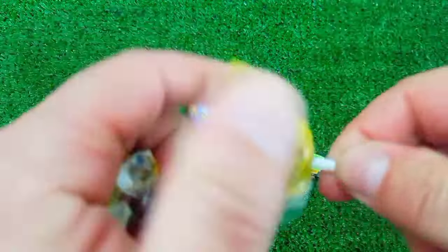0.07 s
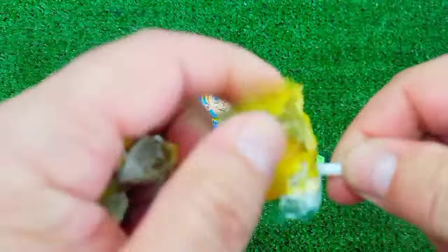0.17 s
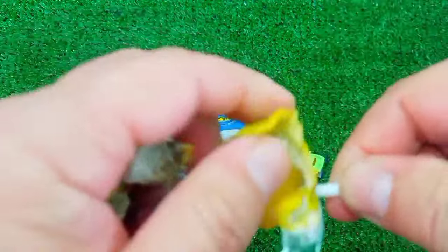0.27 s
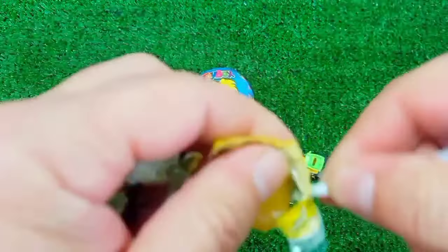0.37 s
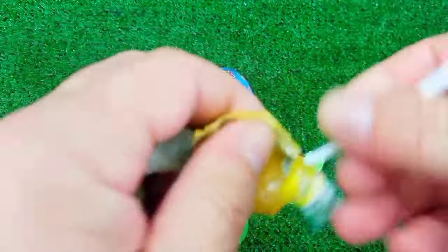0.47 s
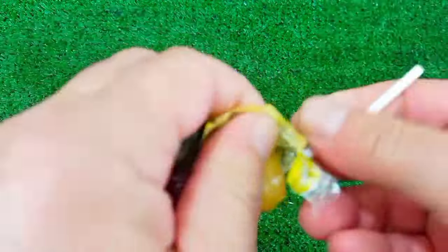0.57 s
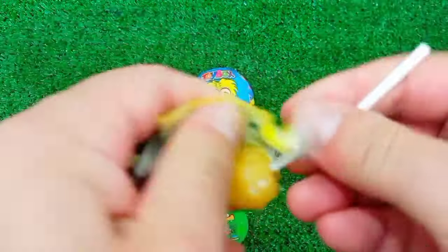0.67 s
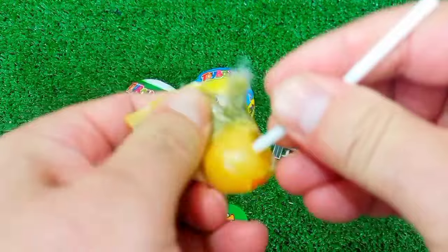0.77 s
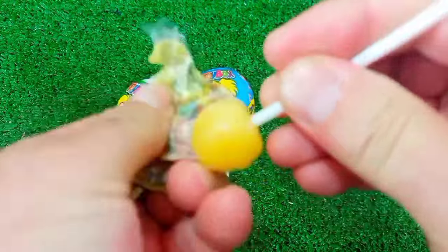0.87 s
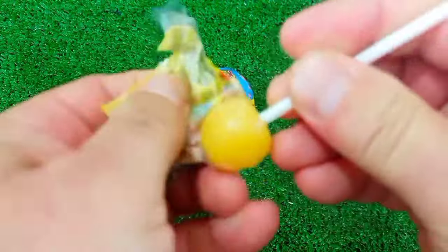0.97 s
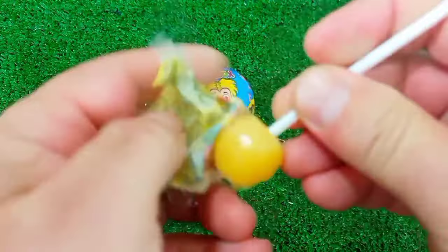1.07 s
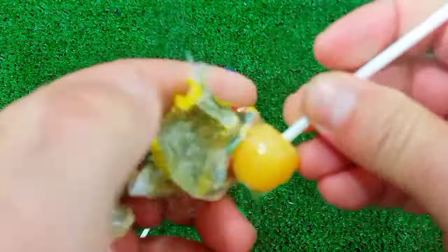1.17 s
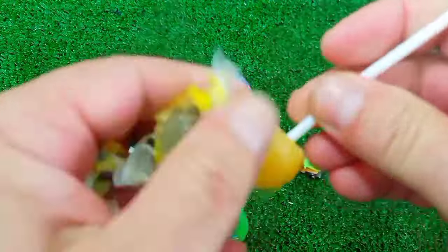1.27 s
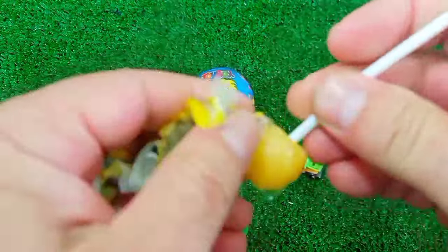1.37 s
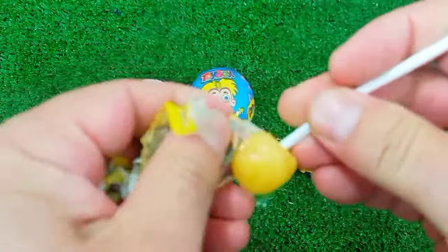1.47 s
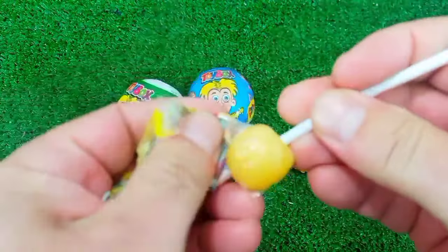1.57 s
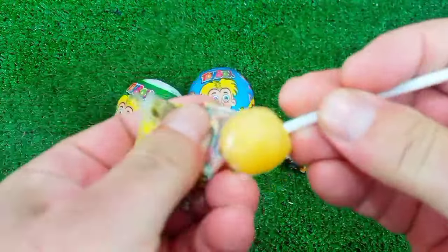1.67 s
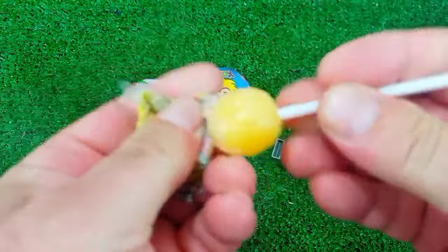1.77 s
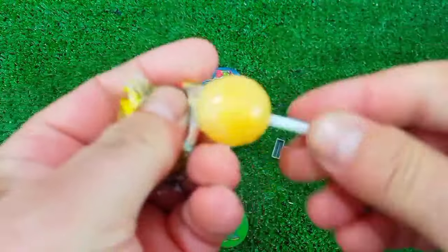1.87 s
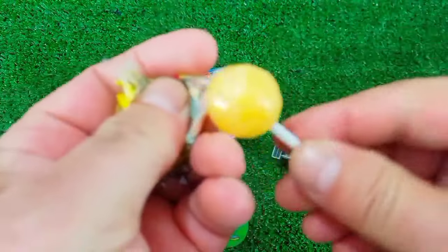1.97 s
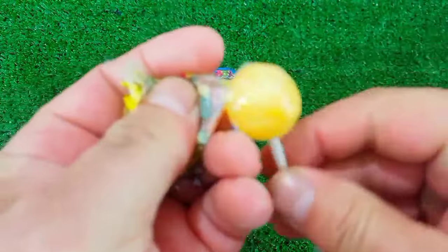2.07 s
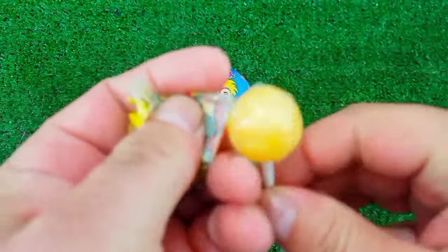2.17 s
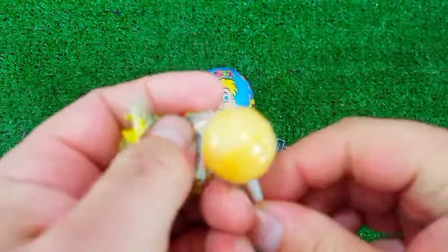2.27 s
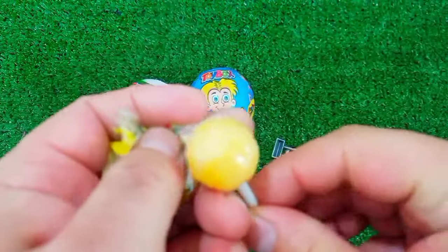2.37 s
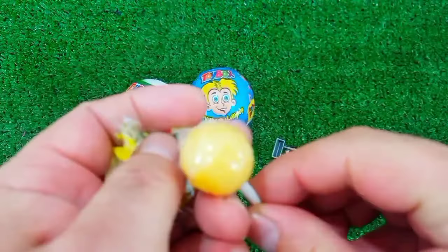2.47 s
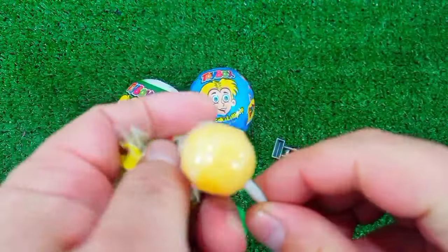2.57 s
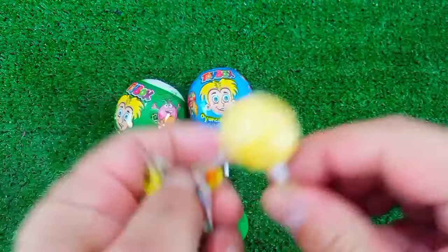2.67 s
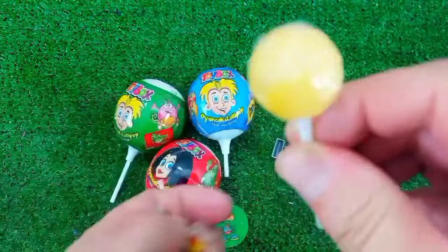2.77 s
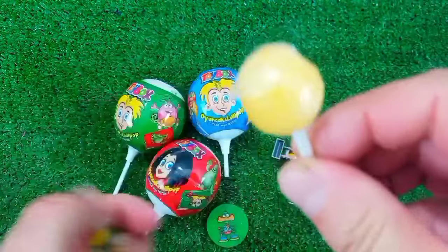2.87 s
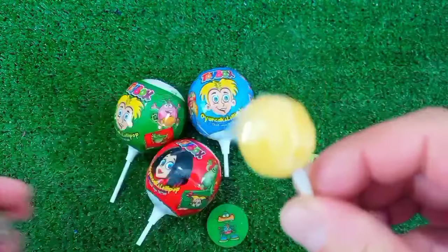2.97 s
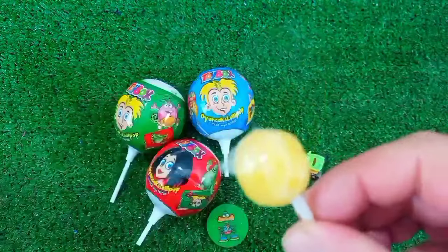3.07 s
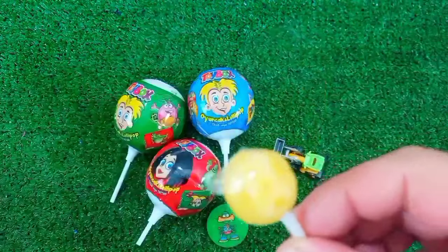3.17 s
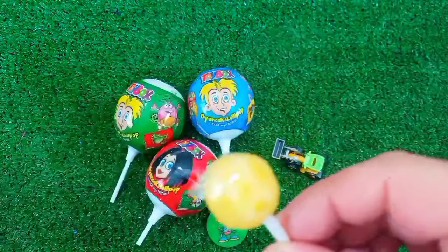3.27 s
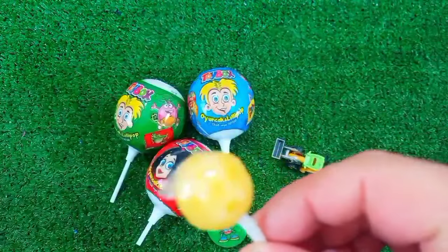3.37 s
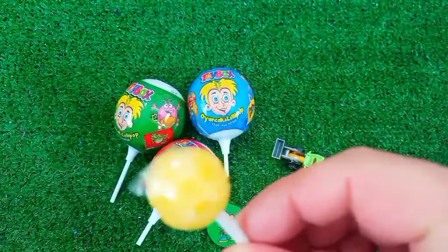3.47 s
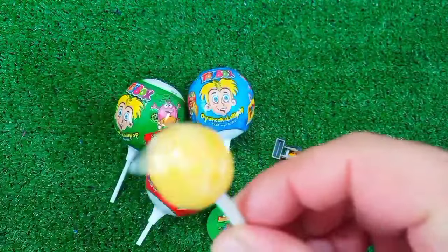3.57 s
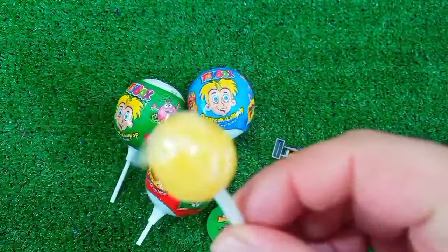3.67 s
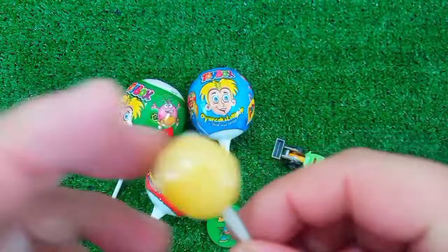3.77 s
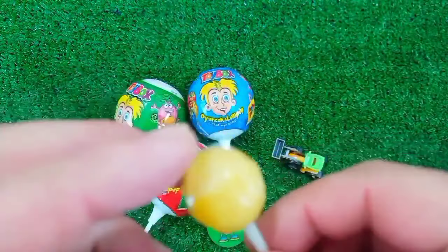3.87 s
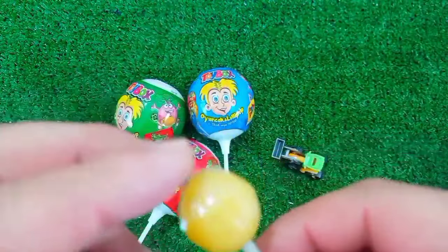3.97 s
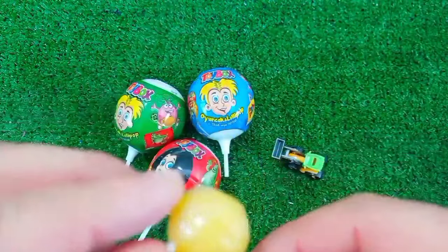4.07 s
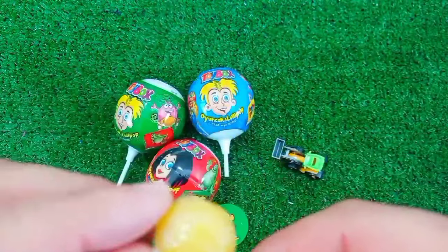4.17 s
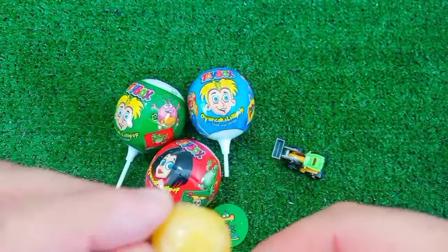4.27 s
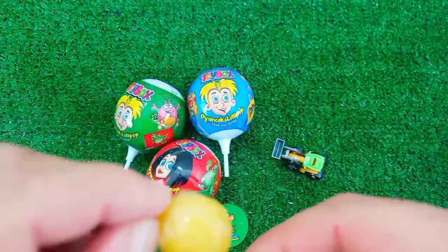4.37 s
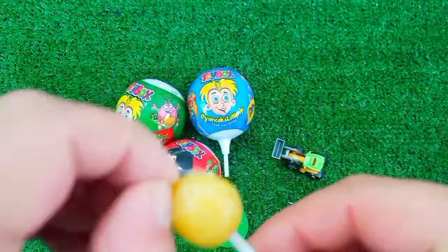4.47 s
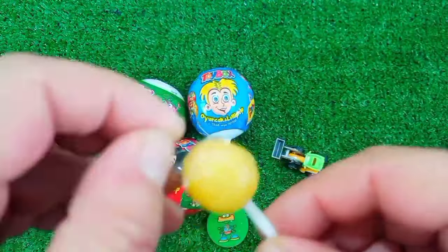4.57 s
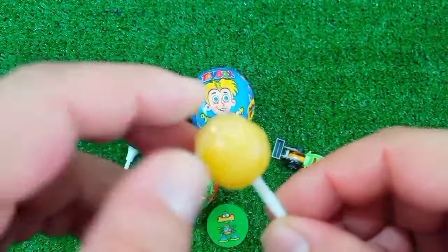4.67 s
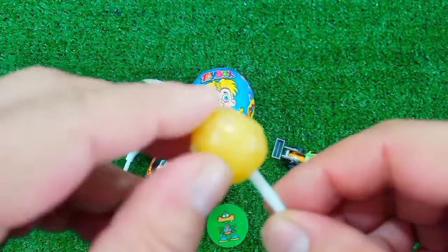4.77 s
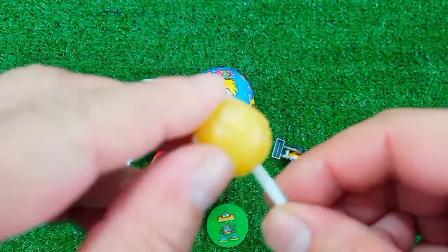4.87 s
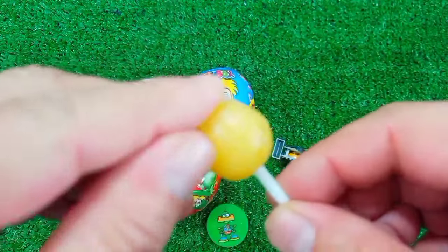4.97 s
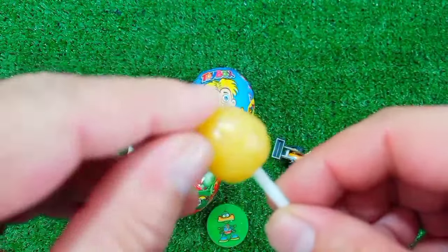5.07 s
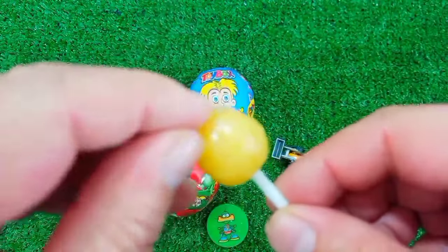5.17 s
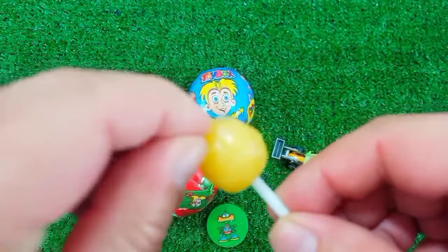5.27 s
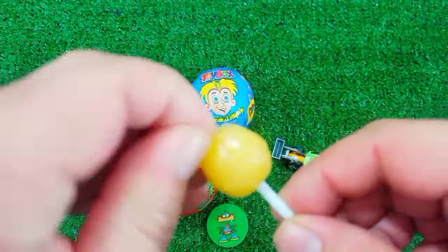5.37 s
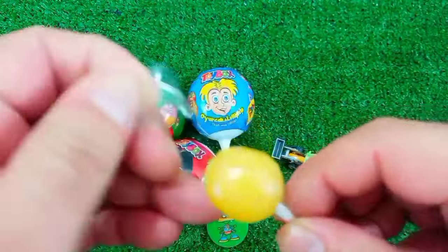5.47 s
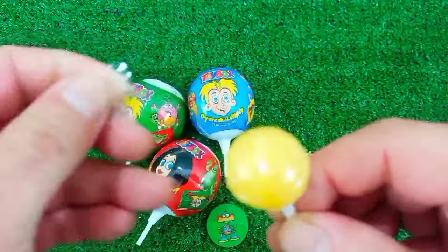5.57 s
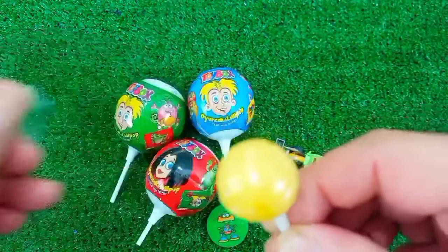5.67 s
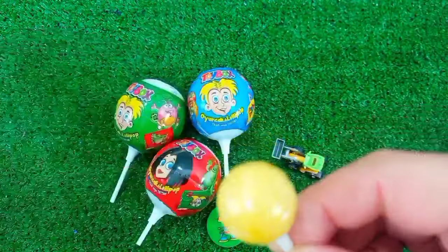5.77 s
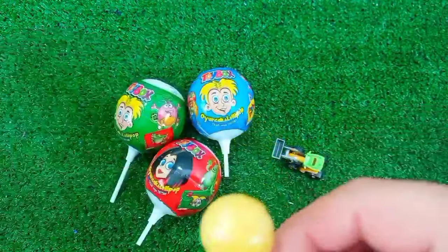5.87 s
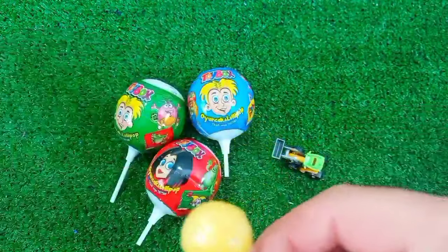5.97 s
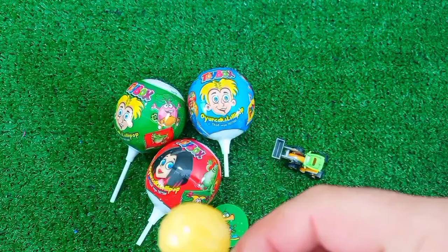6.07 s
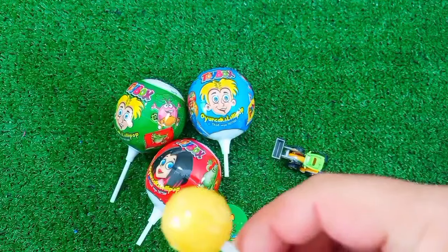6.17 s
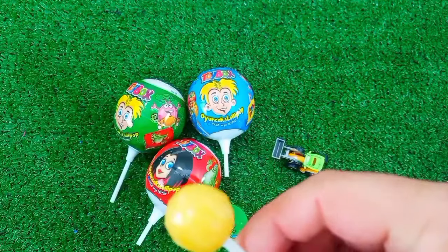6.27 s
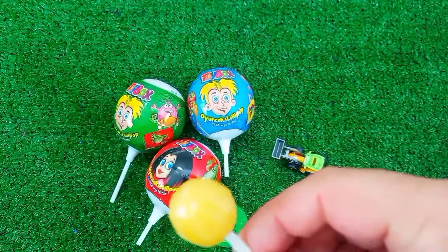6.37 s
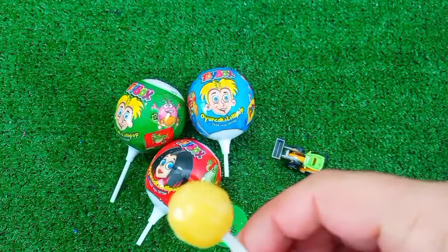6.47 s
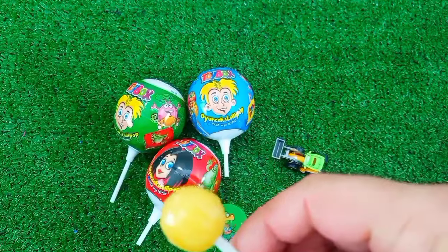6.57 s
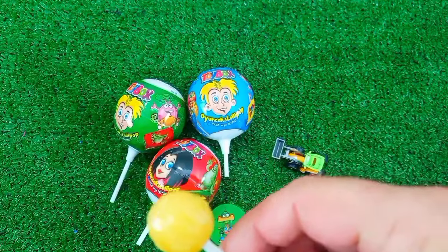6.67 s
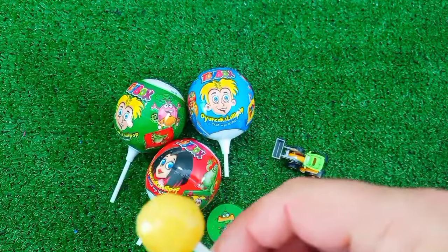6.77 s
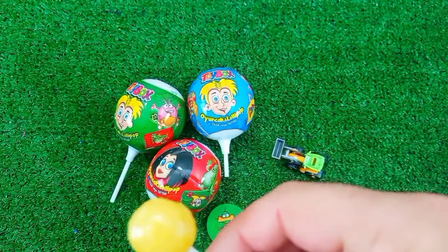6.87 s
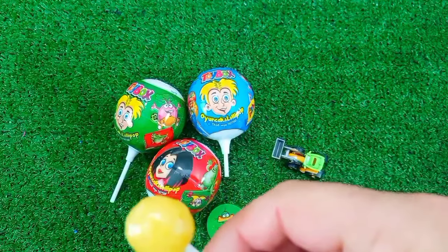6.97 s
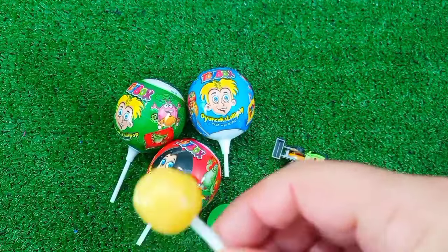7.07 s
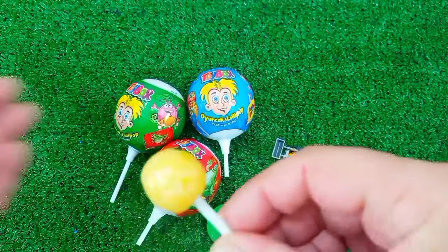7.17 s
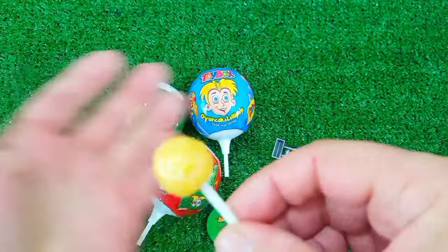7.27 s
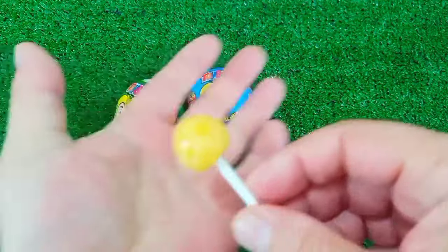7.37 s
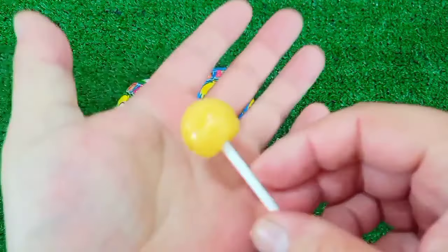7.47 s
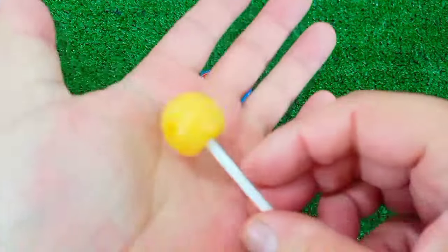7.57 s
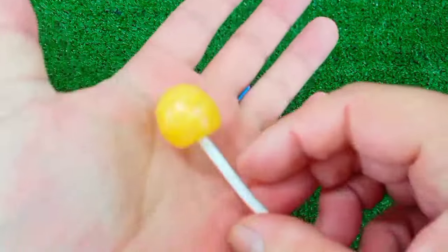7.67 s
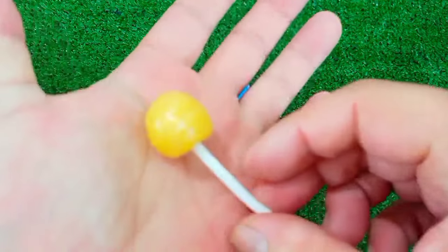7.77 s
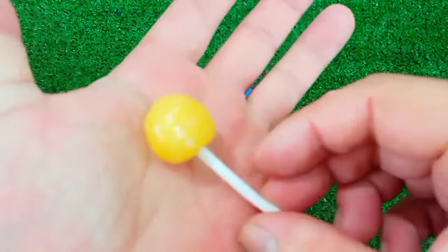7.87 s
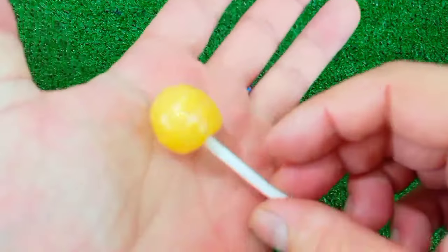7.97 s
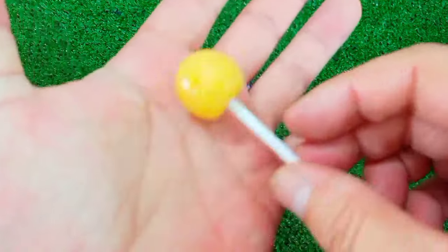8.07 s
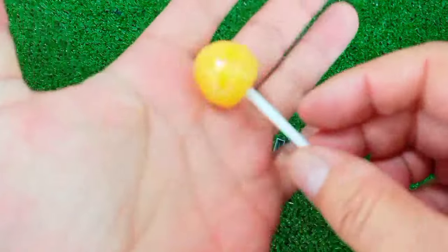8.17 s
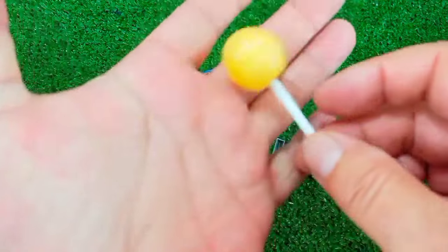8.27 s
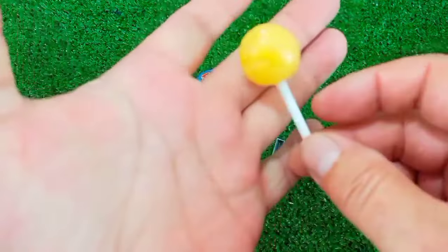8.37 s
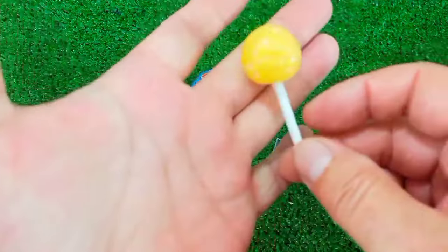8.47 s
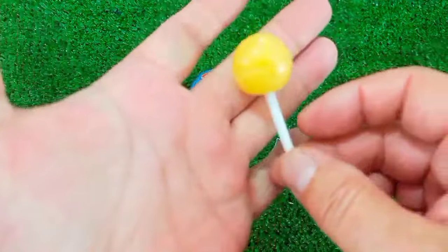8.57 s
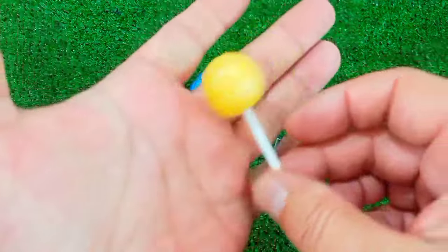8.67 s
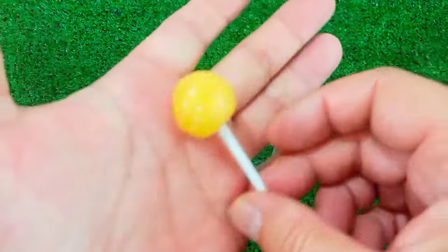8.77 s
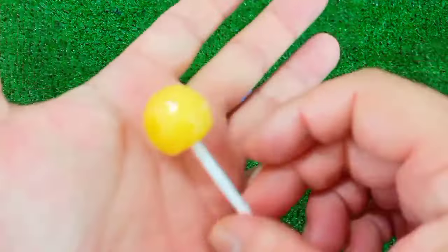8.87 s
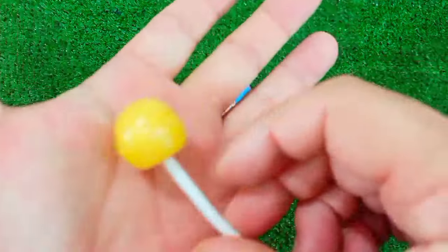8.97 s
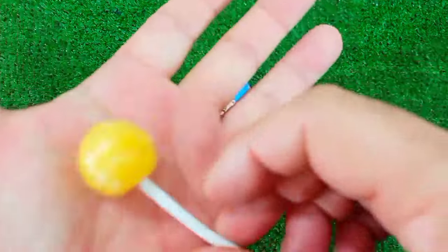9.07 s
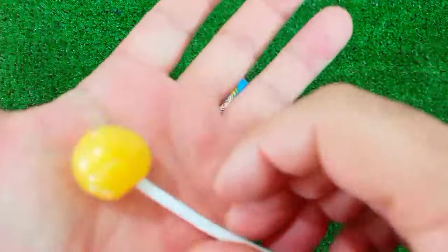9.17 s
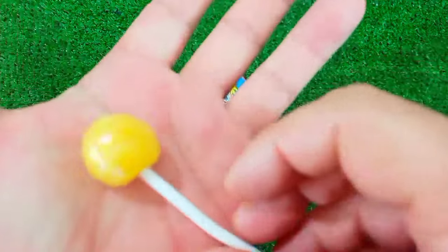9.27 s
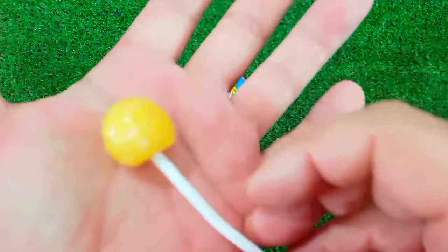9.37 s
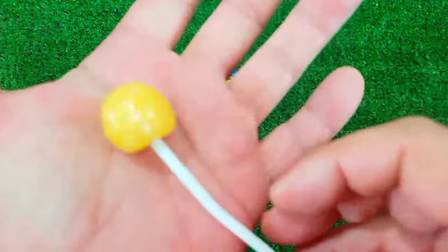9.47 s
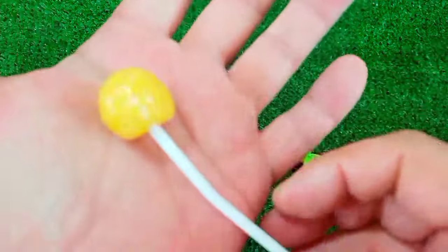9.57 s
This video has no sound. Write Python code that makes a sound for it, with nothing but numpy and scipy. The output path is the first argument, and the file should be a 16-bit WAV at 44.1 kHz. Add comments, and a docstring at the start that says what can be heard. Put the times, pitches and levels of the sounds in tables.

```python
"""Peeling a stiff plastic wrapper

Fingers tear and peel the wrapper off a lollipop close to a phone microphone, then pick off the last scraps.
Each crease that buckles is a snap: a click with a ragged tail, coloured by the ring of a patch of film.
Tugs swell a swarm of small creases and the swish of sliding film; resonant rubs, squeaks, the murmur of
skin and a few low one-sided pops join in, and a small room answers briefly with a tail of decaying noise.
Behind lie shaped noise as hiss, narrow noise bands as a faint whine, a distant cooing and soft low bumps."""
import sys
import numpy as np
from scipy import signal
from scipy.fft import rfft, irfft, next_fast_len
from scipy.io import wavfile
from scipy.ndimage import uniform_filter1d, minimum_filter1d

SR = 44100
rng = np.random.default_rng(int(sys.argv[2]) if len(sys.argv) > 2 else 0)


def generate_wav(signal):
    """Clip the signal to [-1, 1] and save it as 16-bit WAV at the path in sys.argv[1]."""
    frames = np.transpose(np.atleast_2d(signal))
    scaled = np.clip(frames, -1, 1) * 32767
    pcm = np.round(scaled).astype(np.int16)
    wavfile.write(sys.argv[1], SR, pcm)


N = 424683

# Loud buckling creases: [t/s, peak level/dB, main ring f/Hz, lows level/dB, highs level/dB];
# lows (full below 2500 Hz) and highs (full above 9300 Hz) are tilts added to the film colour
CREASE_SNAPS = [(0.0073, -4, 4200, -4, -1), (0.026, -10, 4000, -2.5, -32.5), (0.043, -5, 5730, -3, -24),
                (0.0529, -3, 5170.0, 8.5, -18), (0.0668, -8.5, 6540, 5.5, -18.5),
                (0.074, 1, 6000, -17.5, -18), (0.0906, 0.5, 4080, 4, -10.5), (0.099, -5.5, 6260, 8, -28.5),
                (0.12, -6, 7040, -5.5, -5), (0.1305, -15, 6900, -17, -8), (0.137, -3.5, 6920, -26, 1),
                (0.1509, -3.5, 3880, 7, -20.5), (0.1841, -5, 2380, 25, -1.5), (0.1869, 1, 2240, 5.5, -13.5),
                (0.2027, 5.5, 4820, -19, -7.5), (0.2347, -18.5, 4440.0, 7.5, -20),
                (0.276, -3, 4930, 4, -25), (0.2843, -0.5, 4980, -17.5, -18),
                (0.291, -10.5, 5840, 5.5, -6.5), (0.3195, -14.5, 5320, -16, -6),
                (0.3454, -8.5, 3660, -11.5, -4.5), (0.391, -5, 4000, 5, -12.5), (0.4315, -11, 1680, 5, -18),
                (0.4474, -11, 5600, 3.5, -8.5), (0.459, -1, 9150, 5, -9), (0.5102, -2, 5600, -12, -18),
                (0.5144, -7, 6550, -13.5, -6), (0.5246, -13, 5660, 7, -23.5), (0.5538, -5, 6600, -11, 3),
                (0.5567, -19, 3200, 16, -2), (0.5803, -15.5, 7020.0, 23, -14), (0.589, -11, 7160, -6, 2),
                (0.604, -1.5, 7500, -25.5, -21), (0.6523, -5.5, 10500, -10, -4),
                (0.728, -22.5, 7100, -7.5, -8.5), (0.7395, -2, 6950, -25.5, -3),
                (0.745, -1, 7400, -10.5, -2.5), (0.7487, -7.5, 10300, -9.5, -3),
                (0.763, -4, 4350, -4, -13.5), (0.774, -4.5, 6430, -16, 13), (0.7927, -8, 6060, -5.5, -10.5),
                (0.8, -7.5, 4125, 10, -15), (0.8107, -8, 7100, 6.5, 2), (0.8345, -1.5, 5660, 2, -5),
                (0.8393, -5.5, 5900, -9.5, -16.5), (0.8633, -2, 5000, -28.5, -7),
                (0.884, -4.5, 5666, -7, -10.5), (0.888, -3, 5800, -12.5, -10), (0.894, -4.5, 5670, 9, -4),
                (0.9064, -7.5, 4707, -8.5, 0.5), (0.9255, -1.5, 6200.0, 5, -23),
                (0.9338, -10, 3937, -9, -9), (0.977, -14.5, 4332, -0.5, -1.5),
                (1.0221, -5.5, 3900, 3.5, -20), (1.0262, -3.5, 3843, 15, -17.5),
                (1.0344, -7, 7160, -8, -16), (1.044, 0.5, 6860, -24, -28.5),
                (1.048, -12.5, 4340, -11.5, -9), (1.057, -10.5, 7527, -17, -12.5),
                (1.0793, -4, 6700, -5.5, 5), (1.0993, -2, 3840, -7, -39), (1.103, -4.5, 3417, -0.5, -20),
                (1.1075, 2.5, 2130, -3, -12.5), (1.1529, -2, 6820, -0.5, -12), (1.1832, 4, 3850, 7, -15),
                (1.2004, 0.5, 6800, -2, -4), (1.2047, 3, 4230, -12, -21), (1.228, -11.5, 5810.0, -6.5, -15),
                (1.2572, -6, 6600, -7, -4), (1.2785, -8, 4030, -23, -32), (1.315, -15.5, 3900, -17, -27),
                (1.3248, -7.5, 6670, -4, -9.5), (1.3478, -0.5, 9400, -30, -11), (1.366, -5, 7000, 0.5, 3),
                (1.4028, -13.5, 6720.0, -4, 20), (1.4388, 2.5, 4500, -8, -40.5),
                (1.4581, 1, 4417, -23.5, -2), (1.47, 0.5, 4450, -10.5, -10), (1.4828, -1, 4460, 6.5, -15),
                (1.4944, -0.5, 6800, -5, -19), (1.5003, -5, 4450, 2.5, -13.5),
                (1.5287, -1.5, 6560, 10, -10), (1.5335, -3, 6850, 4, 2.5), (1.574, 1, 6200, -28.5, 5.5),
                (1.5827, -8.5, 6070.0, -11.5, -3.5), (1.616, -6, 6300, 4, -5.5),
                (1.6478, -2.5, 3900, -14.5, -21.5), (1.653, -5.5, 6170, -20, -11),
                (1.666, 1, 6200, -28.5, -3.5), (1.6707, 1, 6000, -31, -2.5),
                (1.6828, -10, 6670, -11.5, -5.5), (1.7159, -3, 5960, -12, -4),
                (1.7307, -8.5, 3570, -25, -5), (1.7417, -10, 6260, -9.5, -13),
                (1.762, -10.5, 2100, -28, -27), (1.8395, -20, 5120.0, 4, -2),
                (1.8508, -13, 6160.0, -14, -4), (1.8541, -12, 6250, -7, -21), (1.873, -17, 3420, -2, -7),
                (1.904, 0, 5900, -36, -16), (1.908, -12, 5250.0, 2, -5.5), (1.9498, -16.5, 6000, -12, -14),
                (1.989, -26.5, 5430, -30.5, 1), (2.0133, -13.5, 3880, -14, -15),
                (2.0227, -26.5, 5990.0, -17, -3), (2.0411, -2.5, 6250, -11, -6),
                (2.052, -6.5, 6300, -21, -7), (2.063, -13, 5800, -28, -17), (2.0858, -18, 5930, -29, -25),
                (2.1563, -25, 4000, -18, 3), (2.2437, -21, 6070, -5.5, -9), (2.2543, -21, 6040, 5, -5.5),
                (2.3128, -21.5, 5800, -7.5, -21.5), (2.3505, -15.5, 2940, -31, -15.5),
                (2.367, -6.5, 10100, -25, -32.5), (2.3795, -4, 9300, -13.5, -30.5),
                (2.397, -19, 4500, -5, -20.5), (2.4389, -4.5, 6960, -20, -20), (2.4611, -13, 4550, -5, -8),
                (2.4726, -26, 4450, -8, -24), (2.4823, -13.5, 4400, -10, -36),
                (2.4976, -5, 2880, -42, -20.5), (2.5027, -7.5, 2680, -35, -13),
                (2.5143, -12, 5430.0, -3, -27), (2.533, -1.5, 4440, -10.5, -22),
                (2.551, -12.5, 2700, -24, -36), (2.594, -15.5, 3220, -12.5, -12),
                (2.6208, -5, 2620, -14.5, -21.5), (2.6245, -1, 5400, 0, -18.5),
                (2.659, -4, 14830, -17.5, 6), (2.67, -15.5, 7493, -6, -6.5),
                (2.6901, -2.5, 5717, -26.5, -12), (2.7016, -9.5, 5520, -8.5, -15.5),
                (2.7048, -2.5, 5700, -1.5, -17.5), (2.7162, -3.5, 2740, -4, -32.5),
                (2.7308, 0.5, 5600, -18, -20.5), (2.7382, 8, 5540, -12, -3),
                (2.7394, -6, 5360, -26.5, -18.5), (2.7417, 0.5, 5500, -18, -3.5),
                (2.772, -5, 4150, 2.5, -26.5), (2.84, -16, 2760.0, 19, -9), (2.856, -8.5, 2580, 0, -30),
                (2.866, -6, 3540, 4, -23), (2.9013, -9, 5100, 8, -31), (2.9157, -7.5, 3660, -15, -32),
                (2.9685, -22, 6460, -19, -2), (2.9975, -21.5, 6100, 4, -10), (3.025, -13, 6640, -5, -6),
                (3.0667, -10.5, 5600, -14, -20.5), (3.085, -8.5, 6000, -17, -16),
                (3.0903, -7.5, 6000, -7, -20), (3.134, -10.5, 6160, -17, -9), (3.146, -16, 2400, -9, -5),
                (3.173, -17, 2420, -6, -17), (3.203, -16.5, 6400, -3, 1), (3.317, -23, 3400, -13, -28),
                (3.9064, -29, 14500, -8, 2), (4.49, -13, 6400, -11, 3), (4.5571, -26, 7150, -8, 1.5),
                (4.6293, -13, 15120.0, -14, 15), (4.7681, -15.5, 6830, -20, -8.5),
                (4.9052, -33, 3930, 15, -5), (5.0589, -28, 14810.0, 0.5, 11.5),
                (5.0677, -9, 15000, -24, 18), (5.2002, -15, 6040, -6, -9), (5.288, -9.5, 7200, -18.5, -2.5),
                (5.291, -4, 7240, -26.5, 4.5), (5.359, -2, 7140, -33.5, -1), (5.3673, -5, 7710.0, -11.5, 7),
                (5.427, -13, 14900.0, -28, 8), (5.4315, -15, 9700, -29, 7), (5.4673, -20.5, 6900, -14.5, 4),
                (5.4905, -6, 6700, 0, -3), (5.5154, -3.5, 6950, 0, -20), (5.518, 1, 6300, -2.5, -18),
                (5.528, -1, 6250, -7, -11), (5.5492, -0.5, 6500, 1.5, -14.5), (5.7111, -8, 6260, -19, -6),
                (5.754, -21, 3620, -18, -24), (5.9413, -7.5, 6240, 0, -8), (5.953, -20, 7160, -24, 12),
                (6.242, -16.5, 5430, -21, -21), (6.2742, -14.5, 5800, -10.5, -9),
                (6.357, -23, 7900, -6.5, -12), (6.4072, -23, 9130.0, -8, 2), (6.417, -10.5, 9250, -5, -10),
                (6.42, -7.5, 5600, -30, -4), (6.4213, -4, 3470, -16.5, -11), (6.4314, -8.5, 5850, -22, -14),
                (6.547, -25, 6000, -21, -38), (6.732, -20, 10160.0, -1, 17), (6.802, -25, 2700, -9, -20),
                (7.72, -40.5, 3470, -14, -16.5)]
# Colour of film and microphone: [f/Hz, level/dB]
FILM_COLOUR = [(300, -23.5), (1000, -19), (1500, -12), (2300, -7), (3200, -3.5), (4300, -5), (6900, -5),
               (8100, -6), (10300, 0.5), (12900, -11), (15000, -3), (16000, -17.5)]
# Taut fold slipping in quick even steps: [t/s, length/s, slip rate/Hz, ring f/Hz, peak level/dB]
SLIP_SQUEAKS = [(0.665, .009, 1500, 9930, -15), (.68, 0.024, 540, 10170, -10.5)]
# Tugs and rubs of the fingers: [crest t/s, rise/s, fall/s, rustle level/dB, lows level/dB, highs level/dB];
# rise and fall span 20 dB in the middle band; lows and highs are relative to the rustle
FINGER_TUGS = [(0.0, .02, 0.0047, -14.5, -4, -10), (0.051, 0.025, 0.14, -27, -8, -13.5),
               (0.184, 0.0065, 0.065, -27.5, 1, -14), (0.29, 0.04, 0.035, -26.5, -3.5, -10),
               (0.364, 0.026, 0.052, -29, -2, -13), (0.457, 0.016, 0.047, -26.5, -5.5, -12),
               (0.547, 0.11, 0.085, -32, -8, -8.5), (0.69, 0.066, 0.052, -35.5, -19, 2),
               (0.77, 0.03, 0.11, -26, -15, -10), (0.96, 0.078, 0.083, -19.5, -8, -5),
               (1.11, 0.18, 0.24, -31, -6.5, -10), (1.33, 0.17, 0.13, -40.5, -5, -23),
               (1.211, 0.033, 0.065, -24, -4.5, -5), (1.27, 0.057, 0.019, -28.5, -1.5, -22),
               (1.402, 0.041, 0.043, -31, -1.5, -8.5), (1.47, 0.11, 0.037, -36.5, 2.5, -11),
               (1.523, 0.067, 0.08, -20.5, -15.5, -4.5), (1.645, 0.0045, 0.068, -23.5, -17, -4),
               (1.735, 0.048, 0.031, -18.5, -33, -4), (1.83, 0.25, 0.12, -43.5, -13, -7),
               (1.906, 0.085, 0.13, -40.5, -37, -5), (2.087, 0.1, 0.043, -40.5, -12.5, -1),
               (2.252, 0.13, 0.26, -49.5, -23.5, -5), (2.387, 0.027, 0.017, -42, -9.5, -31),
               (2.439, 0.012, 0.22, -41.5, -12, -14), (2.627, 0.12, 0.32, -47, -6, -0.5),
               (2.74, 0.0095, 0.077, -23.5, -5, -8.5), (2.89, 0.074, 0.041, -27.5, -2.5, -7),
               (3.0, 0.36, 0.31, -46.5, -13, -5), (3.076, 0.026, 0.057, -35.5, -7.5, -35),
               (3.154, 0.098, 0.054, -38, -15, -7), (3.23, 0.065, 0.046, -49, -5, -5),
               (3.315, 0.067, 0.06, -42.5, -17, -15), (3.39, 0.044, 0.077, -41, -20, -12),
               (3.473, 0.024, 0.071, -43, -11.5, -4.5), (3.637, 0.083, 0.022, -52, -9, -6),
               (3.816, 0.37, 0.04, -57.5, -8, -8), (4.05, 0.83, 1.74, -64.5, -15.5, -6),
               (4.67, 0.032, 0.054, -58.5, 2, -15), (4.91, 0.036, 0.066, -53.5, -7, -8),
               (5.395, 0.21, 0.12, -52.5, -15.5, 2.5), (5.498, 0.0095, 0.13, -20, -5, -2.5),
               (5.59, 0.06, 0.088, -34.5, -9, -17), (5.71, 0.09, 0.16, -49, -4, -6),
               (5.941, 0.0034, 0.059, -35, -10.5, -35), (6.062, 0.035, 0.062, -43, 2.5, -11.5),
               (6.252, 0.015, 0.082, -35, -13.5, -13), (6.346, .008, 0.16, -39, -5, -8),
               (6.427, 0.069, 0.042, -26.5, -12.5, -3.5), (6.564, 0.021, 0.05, -40, -14.5, -22),
               (6.734, 0.14, 0.031, -66.5, 2.5, 3.5), (6.812, 0.022, 0.037, -42, -18, -10)]
# Turn from creasing to sliding: [t/s, crackle level/dB, swish level/dB], offsets added to the rustle
HANDLING_MANNER = [(0, 3, 2), (1.8, 0, -3.5), (2.7, 3, 0.5), (3.5, -2.5, 2), (5.5, -0.5, -3),
                   (5.55, -5, -2.5), (5.7, -12.5, -3), (6.24, 1.5, 5.5), (6.36, -3, 1.5), (6.45, -6.5, 2),
                   (6.9, -1.5, 9)]
# Brief rubs in which one fold of film sings: [t/s, f/Hz, length/s, level/dB]
FOLD_RUBS = [(0.046, 846, 0.011, -44.5), (0.091, 494, 0.015, -50), (0.137, 450, 0.017, -50),
             (0.339, 660, 0.073, -44.5), (0.631, 3730, 0.045, -41), (1.644, 1230, 0.013, -37.5),
             (2.071, 2320, 0.029, -41.5), (3.119, 6000, 0.071, -34.5), (3.13, 2330, 0.075, -38.5),
             (3.213, 720, 0.04, -56.5), (3.447, 1500, 0.1, -60), (4.658, 2280, 0.053, -57.5),
             (5.55, 6740, 0.098, -34.5), (5.745, 3150, 0.031, -47.5), (6.028, 2540, 0.11, -52),
             (6.054, 810, 0.1, -64.5), (6.27, 1020, 0.06, -63), (6.699, 1385, .05, -59.5),
             (6.793, 2680, 0.055, -44)]
# Low pops under some snaps: [t/s, peak level/dB before the high-pass]
LOW_POPS = [(.8885, -27), (2.532, -36), (5.2042, -42), (5.5478, -16), (5.753, -42), (5.9412, -44)]
# Reflections from hands and table: [delay t/s, level/dB]
NEAR_ECHOES = [(.0019, -16.5), (.0058, -21.5), (.0075, -24)]
# Left-right difference: [f/Hz, level/dB]
STEREO_WIDTH = [(100, -20), (500, -18), (1500, -35), (3000, -36), (5000, -18), (8000, -17), (14000, -14)]
# Soft bumps: [t/s, f/Hz, length/s, level/dB before the tremble]
SOFT_BUMPS = [(4.243, 150, .115, -41), (3.96, 85, .08, -56), (3.45, 320, .09, -58), (6.05, 200, .09, -57),
              (3.22, 220, .06, -57), (5.95, 75, .06, -57), (3.57, 210, .05, -62)]
# Distant cooing: [t/s, length/s, pitch f/Hz, peak level/dB of each of two lines before the blur]
DISTANT_COOS = [(0.0, 0.65, 488, -62.5), (2.746, 0.35, 484.5, -58), (6.354, 0.55, 478, -58.5),
                (9.296, 0.14, 446, -66), (9.562, 0.12, 428, -66.5)]
# Flickering whine lines at fixed pitches: [f/Hz, width/Hz, level/dB before the flicker]
WHINE_LINES = [(615, 63, -87.5), (1900, 25, -86), (2540, 91, -82), (2770, 35, -85.5), (3000, 70, -85),
               (3210, 30, -83.5)]
# Swell of the strongest whine line: [t/s, level/dB]
WHINE_SWELL = [(3.0, -83), (3.23, -75), (4.101, -79.5), (4.5, -87.5), (4.679, -69.5), (5.068, -91.5),
               (5.389, -67), (5.801, -99), (6.5, -65.5), (6.742, -67.5), (7.099, -75), (7.55, -96),
               (7.83, -66), (8.149, -86), (8.48, -73.5), (8.56, -88.5), (8.7, -67.5), (8.8, -82),
               (9.63, -84)]
# Spectral shape of the hiss: [f/Hz, relative level/dB per Hz]
HISS_COLOUR = [(20, -25), (40, -1.5), (102, 3.5), (403, -8.5), (690, -15), (981, -18.5), (1400, -13),
               (3130, -10), (3880, -12), (6850, -14), (8050, -24.5), (12000, -27), (14000, -27),
               (14900, -13.5), (15800, -21)]

GRAINS_PER_S, GRAIN_SPREAD_DB = 880, 5
LOWS_PACE, HIGHS_PACE = 0.98, 1  # how fast lows and highs swell and die against the middle
TUG_ROUNDNESS = 1.3  # 1 = pointed crest, 2 = rounded
RUB_WIDTH = 0.18  # share of the pitch, never under 450 Hz
FINGERS_FLICKER_DB = 4
POP_S = 0.00012  # time from onset to peak
ROOM_T60_S, WALL_CUT_HZ, ROOM_DB = .085, 6000, -14.5
COO_SAG_HZ_PER_S, COO_APART_HZ = 30, 80  # fall of pitch; gap of the two lines
COO_CREST, COO_BLUR_DB = 0.64, 7  # under 1 the crest comes early; limit of the level tremble
WHINE_HZ = 1260  # strongest line
HISS_DB = -64.5  # rms, before the bass fluctuates
LOPSIDED = 0.026  # share of the squared pressure, before its band-pass
CUTOFF_HZ, CEILING = 15900, .9


def amp(db):
    """Amplitude ratio: twenty decibels make a factor of ten."""
    return 10 ** (np.asarray(db) / 20)


def rms_one(x):
    """Normalisation by signal power: scale to unit rms."""
    return x / np.sqrt(np.mean(x ** 2) + 1e-20)


def at_hz(points, hz):
    """Spectral interpolation: levels in dB vary linearly along a log-frequency axis."""
    points = np.array(points)
    return np.interp(np.log(hz), np.log(points[:, 0]), points[:, 1])


def colour(x, points):
    """Linear filtering: multiply the spectrum by a frequency-dependent gain."""
    size = next_fast_len(N)
    hz = np.maximum(np.arange(size // 2 + 1) * SR / size, 1)
    return irfft(rfft(x, size) * amp(at_hz(points, hz)), size)[:N]


def narrow(hz, width_hz):
    """Resonance: noise passed twice through a damped pole pair becomes a narrow band of unit rms."""
    radius = np.exp(-np.pi * width_hz / SR)
    poles = [1, -2 * radius * np.cos(2 * np.pi * hz / SR), radius * radius]
    once = signal.lfilter([1, 0, -1], poles, rng.standard_normal(N))
    return rms_one(signal.lfilter([1], poles, once))


def filtered(x, order, hz, kind="low"):
    """Butterworth filtering: the passband response is maximally flat."""
    return signal.sosfilt(signal.butter(order, hz, kind, fs=SR, output="sos"), x)


def buckle(s, peak_db, lows_db, highs_db, ring_hz, ring_db, ring_share, t60, rough, size=256):
    """Buckling: a sudden click with a ragged decaying tail, coloured by one resonant patch of film."""
    t = np.arange(size) / SR - .002
    # some creases flip at once, others run along
    pace = 2 ** (rng.random((len(s), 1)) - .6)
    shape = np.where(t < 0, np.exp(t / (0.0012 * pace)), amp(-60 * t / (t60 * pace)))
    shape = shape * np.hanning(size) ** .25
    click = np.abs(t) < .5 / SR
    burst = shape * (rough * rng.standard_normal((len(s), size)) + click)

    hz = np.maximum(np.arange(size // 2 + 1) * SR / size, 1)
    lower = np.clip(np.log(hz / 3700) / np.log(2500 / 3700), 0, 1)
    upper = np.clip(np.log(hz / 7500) / np.log(9300 / 7500), 0, 1)
    tilt = amp(at_hz(FILM_COLOUR, hz) + lower * lows_db[:, None] + upper * highs_db[:, None])
    ring_width = ring_share * np.minimum(ring_hz, 7000)[:, None]
    ring = amp(ring_db) * np.exp(-.5 * ((hz - ring_hz[:, None]) / ring_width) ** 2)

    wave = irfft(rfft(burst) * (tilt + ring), size)
    wave *= (amp(peak_db) / np.abs(wave).max(axis=1))[:, None]
    polarity = rng.choice([-1, 1], (len(s), 1))
    out = np.zeros(N + 2 * size)
    first = ((s + t[0]) * SR).astype(int)[:, None] + size
    np.add.at(out, first + np.arange(size), wave * polarity)
    return out[size:N + size]


def snaps():
    """Impulsive radiation: each loud crease buckles once."""
    s, peak_db, ring_hz, lows_db, highs_db = np.transpose(CREASE_SNAPS)
    return buckle(s, peak_db, lows_db, highs_db, ring_hz,
                  ring_db=5.0, ring_share=.12, t60=0.0055, rough=0.13)


def crackle(middle_db, lows_db, highs_db, grit_db):
    """Random superposition: uneven small creases on three patches of film, each keeping its ring a moment."""
    at = np.flatnonzero((rng.random(N) < GRAINS_PER_S / SR) & (middle_db > -100))
    luck = rng.random((N, 3))[at]
    size_db = GRAIN_SPREAD_DB * np.minimum(-np.log(luck[:, 0]), 3.2)
    # patch rings are redrawn every 2600 samples
    patch_hz = np.array([[2400], [4300], [6600]]) * 2 ** (0.11 * rng.standard_normal((3, N // 2600 + 1)))
    patch = np.digitize(luck[:, 1], [.25, .6])
    ring_hz = patch_hz[patch, at // 2600] * 2 ** (0.1 * (luck[:, 2] - .5))
    lows_tilt = (lows_db - middle_db)[at]
    highs_tilt = (highs_db - middle_db)[at] + 12.0 * (luck[:, 2] - .5)
    ring_db = np.where(patch == 0, lows_tilt + 4.5, 6.0)[:, None]
    peak_db = (middle_db + grit_db)[at] + size_db + 2.5
    return buckle(at / SR, peak_db, lows_tilt + 4.0, highs_tilt, ring_hz, ring_db,
                  ring_share=0.074, t60=0.0046, rough=0.15, size=192)


def squeaks():
    """Stick-slip: a row of evenly paced slips that swells and fades."""
    rows = []
    for s, length, rate, hz, db in SLIP_SQUEAKS:
        for k in range(int(rate * length)):
            off_centre = 2 * k / (rate * length) - 1
            rows.append((s + k / rate, db - 7.4 * off_centre ** 2, hz))
    s, peak_db, ring_hz = np.transpose(rows)
    lows_db, highs_db = np.full(len(s), -24.0), np.full(len(s), 6.5)
    return buckle(s, peak_db, lows_db, highs_db, ring_hz,
                  ring_db=15.0, ring_share=0.11, t60=.004, rough=.05)


def handling():
    """Addition of powers: tugs climb to a crest and die away, giving levels of middle, lows and highs."""
    s, rise, fall, db, lows_db, highs_db = np.transpose(FINGER_TUGS)[:, :, None]
    t = np.arange(0, N + 32, 32) / SR
    distance = np.where(t < s, (s - t) / np.abs(rise), (t - s) / np.abs(fall))
    down_db = 20 * distance ** TUG_ROUNDNESS
    bands = [db - down_db,
             db + lows_db - LOWS_PACE * down_db,
             db + highs_db - HIGHS_PACE * down_db]
    totals = [10 * np.log10(np.sum(amp(2 * band), axis=0) + 1e-12) for band in bands]
    return np.array([np.interp(np.arange(N) / SR, t, total) for total in totals])


def friction(middle_db, lows_db, highs_db, grit_db, slide_db):
    """Sliding friction: three noise bands catch and slip on their own, more evenly as sliding takes over."""
    out = 0
    flutter_db = np.clip(3.5 + (grit_db - slide_db) / 4, .5, 6)
    for db, edges in [(lows_db, [1300, 3100]), (middle_db - 2.5, [3100, 8200]), (highs_db - 5.5, [8200, 16000])]:
        swish = filtered(rng.standard_normal(N), 3, edges, "band")
        level = amp(db + slide_db + flutter_db * narrow(40, 120))
        out = out + level * rms_one(swish)
    return colour(out, FILM_COLOUR)


def rubs():
    """Resonance under friction: noise through one mode of a fold, with a quick start and slower fade."""
    t, out = np.arange(N) / SR, np.zeros(N)
    for s, hz, length, db in FOLD_RUBS:
        swell = np.sin(np.pi * np.clip((t - s) / length, 0, 1) ** 0.77)
        out += amp(db) * swell * narrow(hz, max(RUB_WIDTH * hz, 450))
    return out


def fingers(lows_db):
    """Soft friction: skin on skin and stick makes a dull lumpy murmur that grows gently with the handling."""
    murmur = filtered(rng.standard_normal(N), 2, [300, 1300], "band")
    lumps_db = FINGERS_FLICKER_DB * np.clip(narrow(12, 25), -2, 2)
    return amp(0.78 * lows_db - 30.5 + lumps_db) * rms_one(murmur)


def low_pops():
    """Asymmetric impulse: each low pop is one short one-sided pulse, as from an overloaded microphone."""
    t, out = np.arange(N) / SR, np.zeros(N)
    for s, db in LOW_POPS:
        age = np.maximum(t - s, 0) / POP_S
        out += amp(db) * age * np.exp(1 - age)
    return filtered(out, 1, 40, "high")


def near_echoes(x):
    """Early reflection: hands and table return delayed, weaker copies."""
    return x + sum(amp(db) * np.r_[np.zeros(int(s * SR)), x][:N] for s, db in NEAR_ECHOES)


def room(x):
    """Reverberation: convolution with two decaying noise tails, duller than the source."""
    t = np.arange(int(.3 * SR)) / SR
    decay = amp(-60 * t / ROOM_T60_S) * (1 - np.exp(-t / 0.0015))
    tail = filtered(rng.standard_normal((2, len(t))) * decay, 1, WALL_CUT_HZ)
    tail = tail / np.sqrt(np.sum(tail ** 2, axis=1, keepdims=True))
    return signal.fftconvolve(x[None], tail, axes=1)[:, :N]


def stereo_side(near, room_side):
    """Stereo width: short random filtering and slow modulation make a faint, unsteady left-right difference."""
    short_filter = rng.standard_normal(400) * amp(-np.arange(400) / 12)
    short_filter = short_filter / np.sqrt(np.sum(short_filter ** 2))
    unsteady = signal.fftconvolve(near, short_filter)[:N] * narrow(8, 40)
    return colour(unsteady + room_side, STEREO_WIDTH)


def bumps():
    """Structure-borne sound: dull knocks through the table, a low ring that swells, wavers and fades."""
    t, out = np.arange(N) / SR, np.zeros(N)
    waver = np.cumsum(14 * narrow(27.0, 38)) / SR
    for s, hz, length, db in SOFT_BUMPS:
        age = np.clip((t - s) / length, 0, 1)
        tremble = 1 + 0.5 * np.sin(2 * np.pi * 27 * (t - s))
        swell = np.sin(np.pi * age ** 0.79) * tremble
        out += amp(db) * swell * np.sin(2 * np.pi * (hz * (t - s) + waver))
    return out


def cooing():
    """Blurring by distance: two close lines swell, fade and sag in pitch; the upper dies first."""
    t, out = np.arange(N) / SR, np.zeros(N)
    for apart, wander_hz, lasts in ((-COO_APART_HZ / 2, 22.0, 1), (COO_APART_HZ / 2, 30.0, .6)):
        blur = amp(COO_BLUR_DB * np.tanh(narrow(5, 25)))
        tremble = np.cumsum(wander_hz * narrow(22, 40)) / SR
        for s, length, hz, db in DISTANT_COOS:
            age = np.clip((t - s) / (length * lasts), 0, 1)
            swell = np.abs(np.sin(np.pi * age ** COO_CREST)) ** .5 * (age < 1)
            late = t - s - length / 2
            turns = (hz + apart) * late - COO_SAG_HZ_PER_S * late ** 2 / 2 + tremble
            out += blur * amp(db) * swell * np.sin(2 * np.pi * turns)
    return out


def whine():
    """Narrow-band noise: thin unsteady tones of some appliance, the strongest coming and going."""
    s, swell_db = np.transpose(WHINE_SWELL)
    out = amp(np.interp(np.arange(N) / SR, s, swell_db)) * narrow(WHINE_HZ, 45)
    for hz, width_hz, db in WHINE_LINES:
        out = out + amp(db + 5.5 * narrow(2.2, 11)) * narrow(hz, width_hz)
    return out


def microphone_hiss():
    """Random noise: a shaped spectrum whose bass comes in lumps."""
    hiss = amp(HISS_DB) * rms_one(colour(rng.standard_normal(N), HISS_COLOUR))
    rumble = filtered(hiss, 2, 250)
    return hiss + rumble * (amp(2.7 * narrow(4, 10) - 1.5) - 1)


def scene():
    """Superposition: wrapper in front, its room, and the quiet background as left and right."""
    rustle = handling()
    s, *columns = np.transpose(HANDLING_MANNER)
    grit_db, slide_db = [np.interp(np.arange(N) / SR, s, column) for column in columns]
    film = near_echoes(snaps() + squeaks() + crackle(*rustle, grit_db))
    film = film + friction(*rustle, grit_db, slide_db)
    film = filtered(film, 4, 1280, "high")  # thin film moves little air in the bass
    wet = amp(ROOM_DB) * room(film)
    near = film + rubs() + fingers(rustle[1]) + low_pops()
    mid = near + wet[0] + microphone_hiss() + whine() + cooing() + bumps()
    side = stereo_side(near, wet[1])
    return np.array([mid + side, mid - side])


def record(dry):
    """Nonlinear transduction: squared pressure thumps in the bass, a fast limiter acts, the top is cut."""
    dry = dry + LOPSIDED * filtered(dry ** 2, 1, [10, 300], "band")
    room_left = np.minimum(CEILING / (np.abs(dry).max(axis=0) + 1e-9), 1)
    gain = uniform_filter1d(minimum_filter1d(room_left, size=61), size=61)
    top_cut = signal.ellip(10, .3, 95, CUTOFF_HZ, fs=SR, output="sos")
    return signal.sosfilt(top_cut, gain * dry)


dry = scene()
out = record(dry)
generate_wav(out)
```